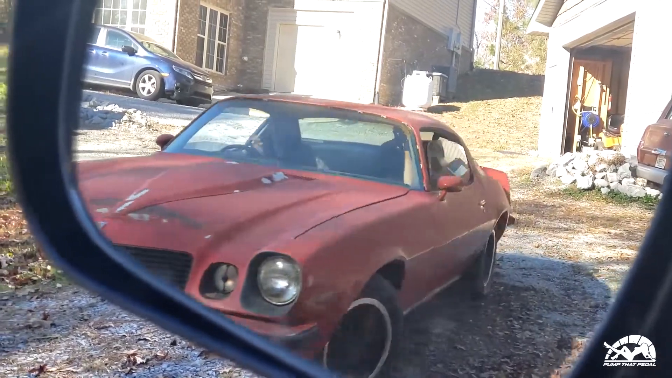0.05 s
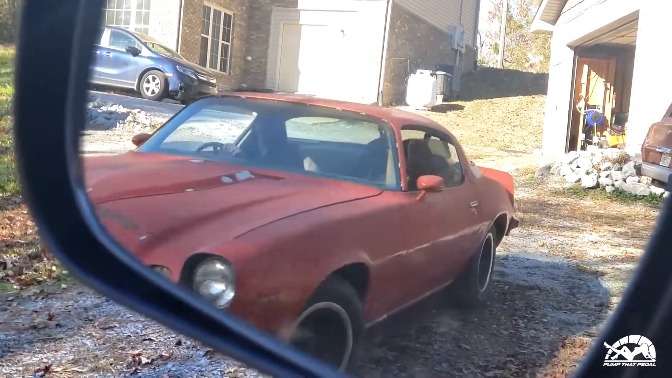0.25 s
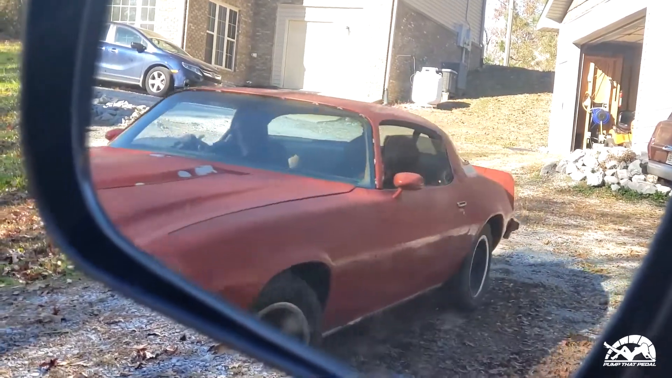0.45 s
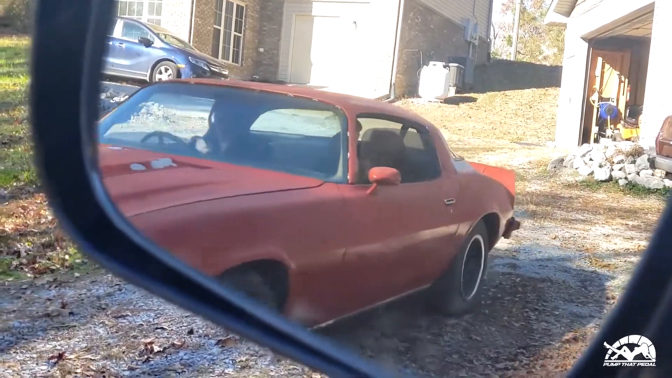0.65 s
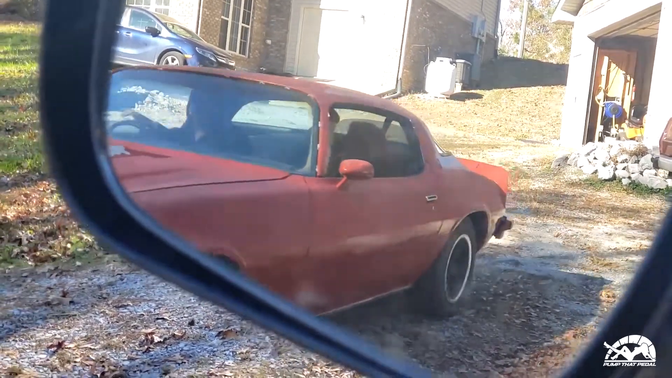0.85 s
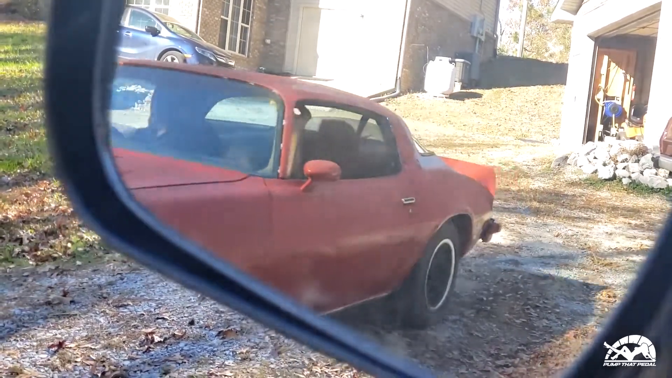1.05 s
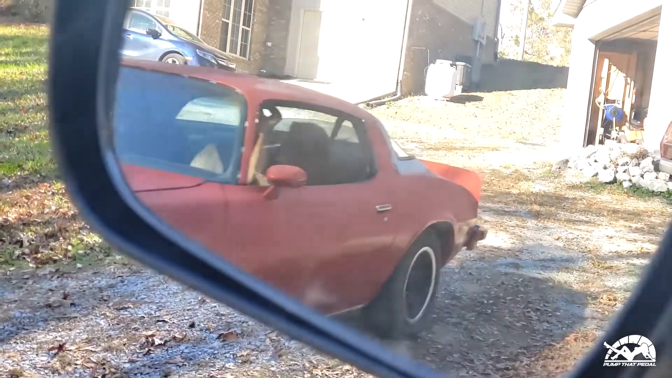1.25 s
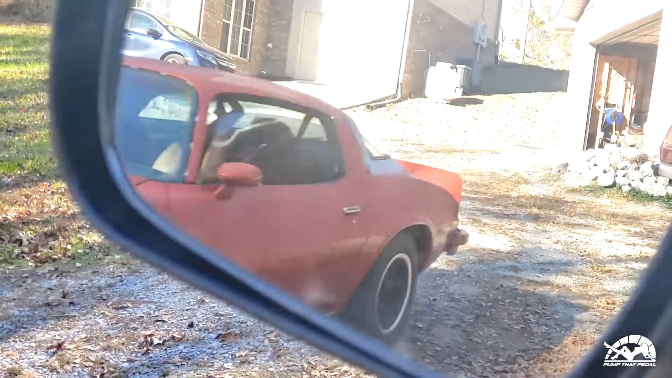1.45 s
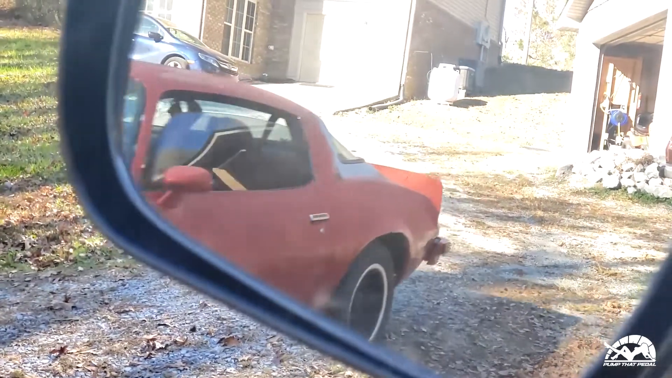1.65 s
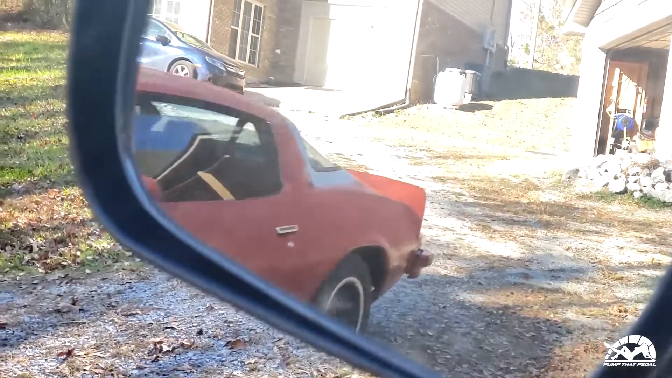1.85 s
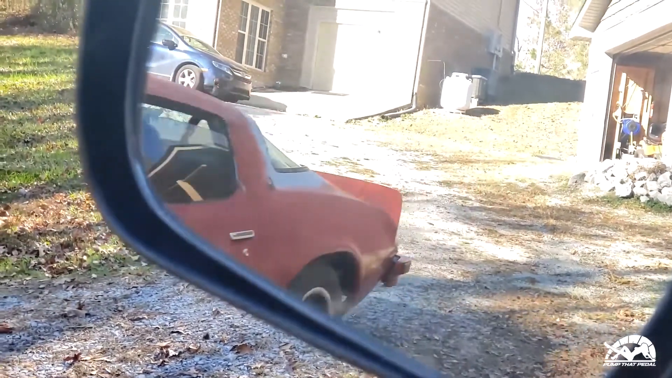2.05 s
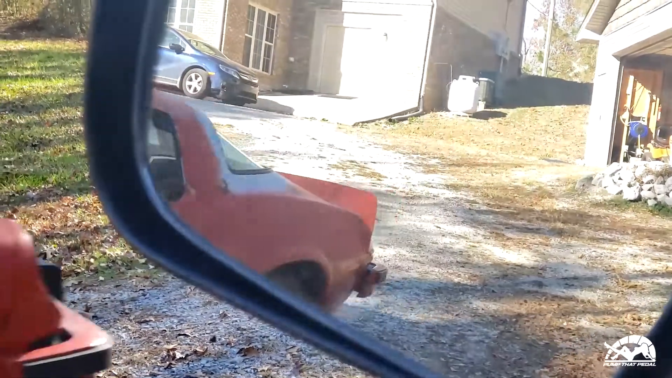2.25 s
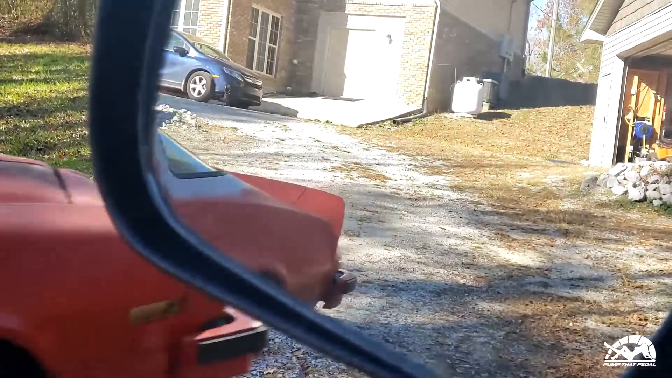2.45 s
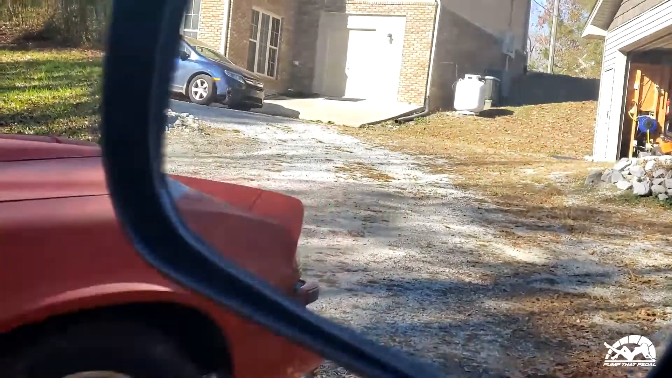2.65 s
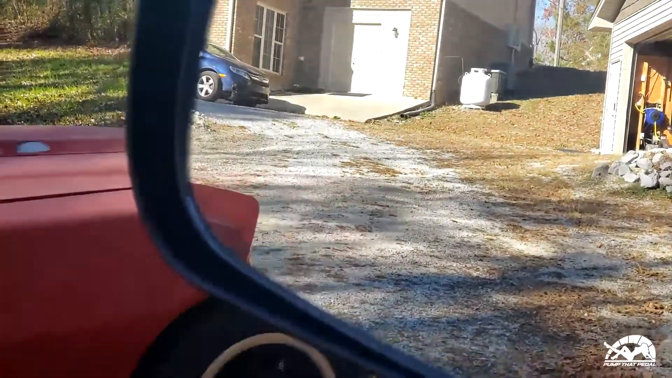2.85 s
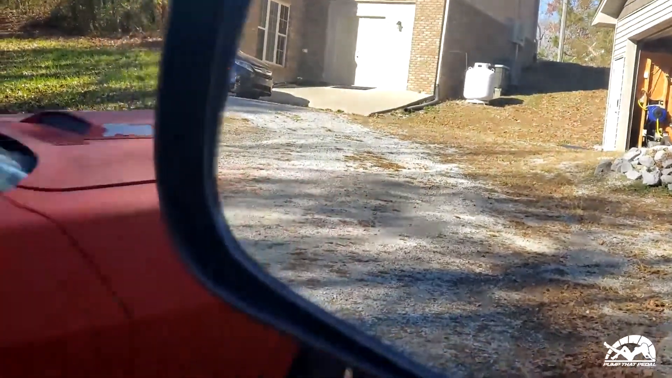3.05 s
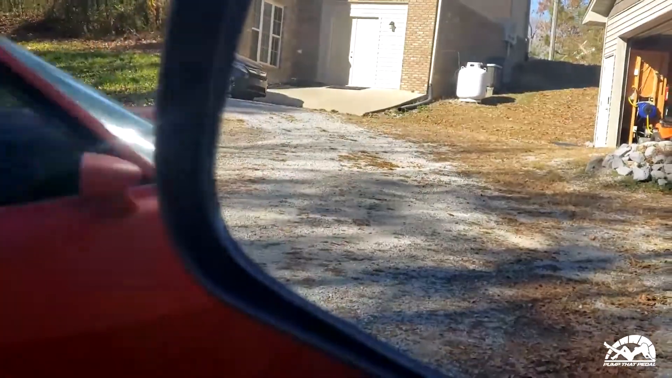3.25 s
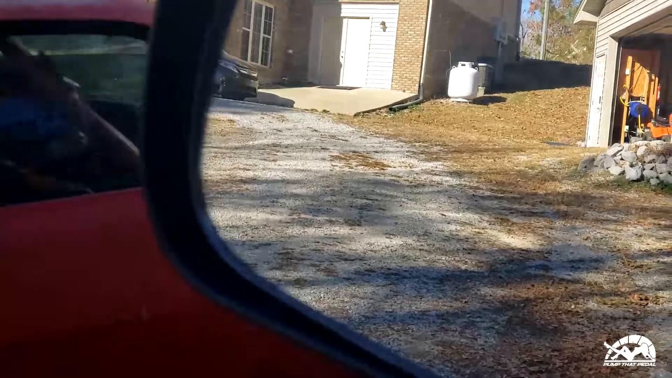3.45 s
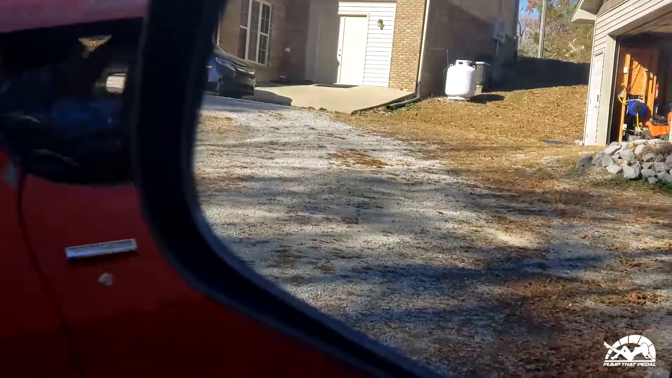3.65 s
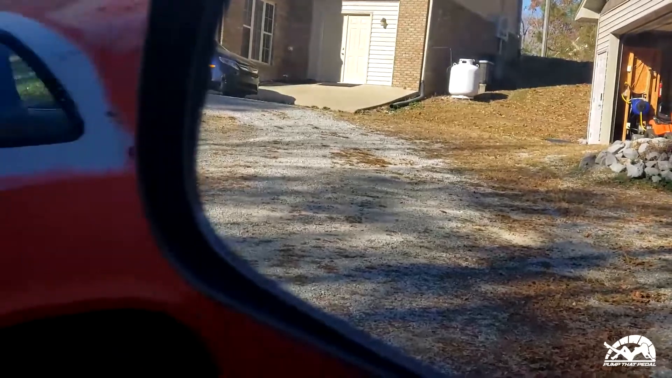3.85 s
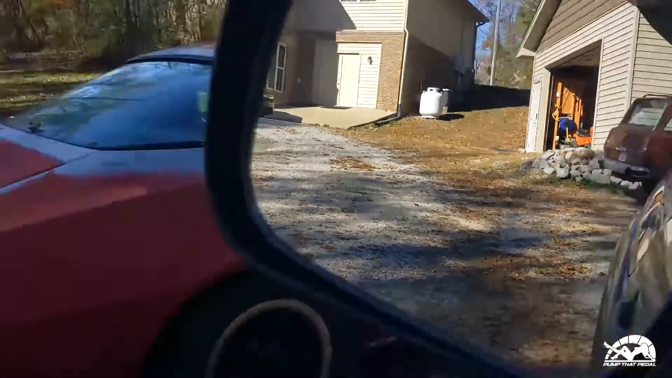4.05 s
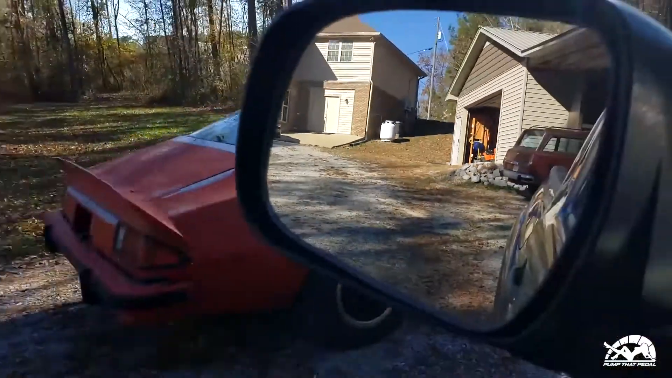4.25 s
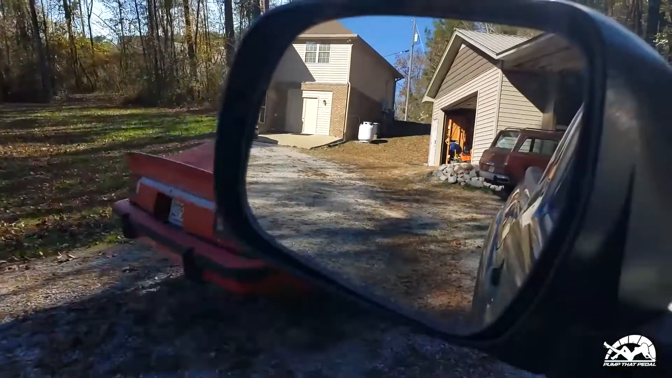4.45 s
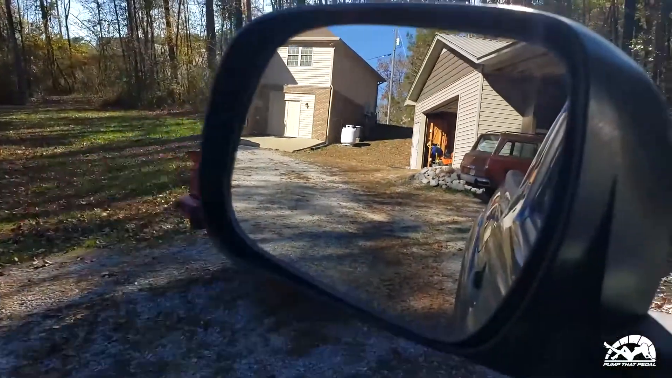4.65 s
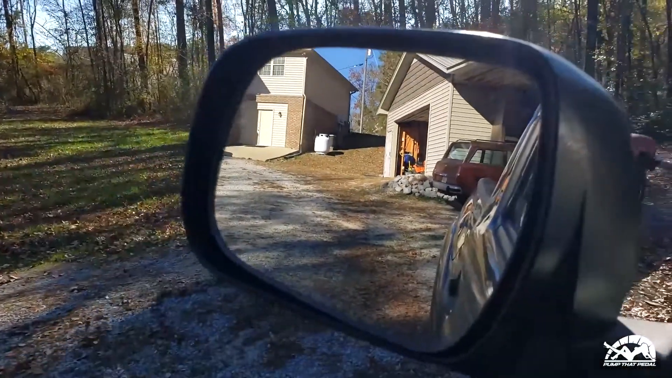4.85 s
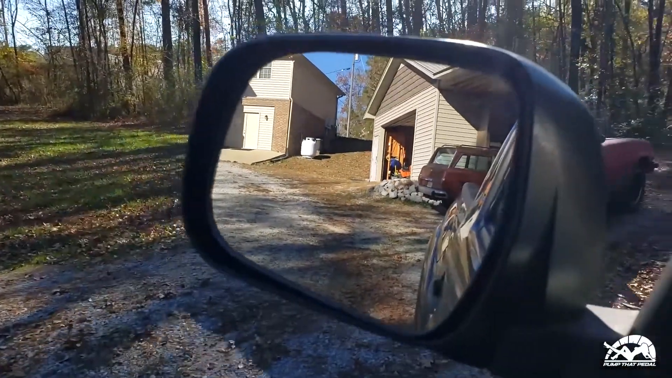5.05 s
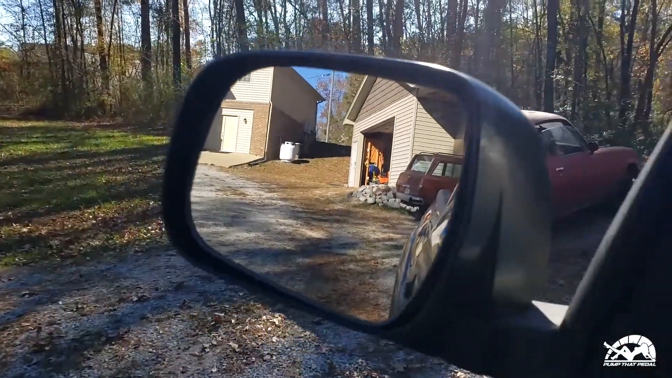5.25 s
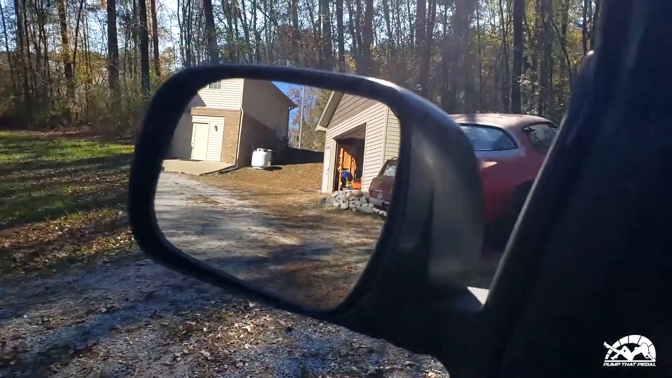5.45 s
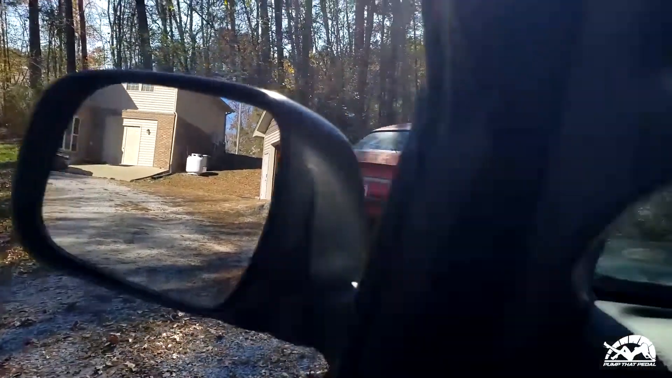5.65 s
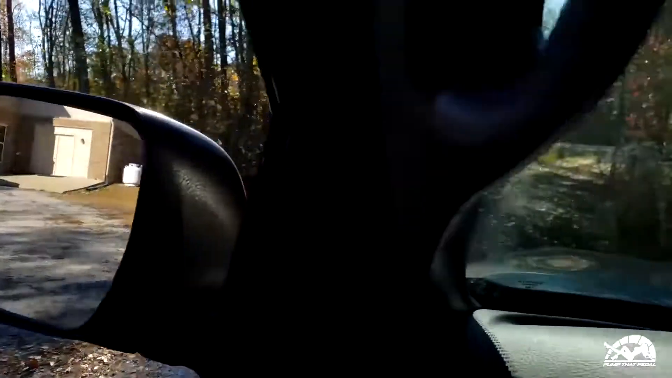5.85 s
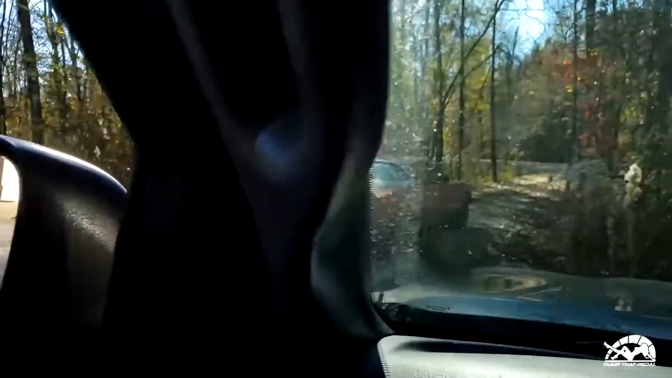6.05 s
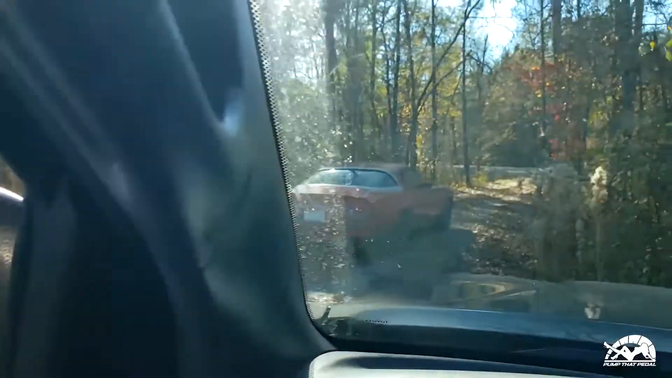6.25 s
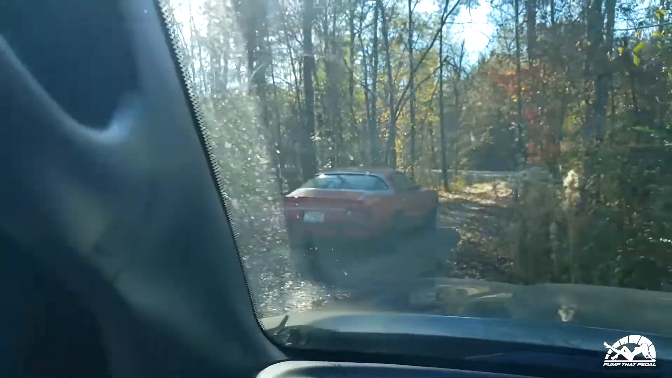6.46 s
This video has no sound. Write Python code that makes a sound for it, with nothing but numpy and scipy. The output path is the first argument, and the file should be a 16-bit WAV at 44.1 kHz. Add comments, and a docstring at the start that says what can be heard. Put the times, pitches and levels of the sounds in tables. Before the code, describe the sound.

Close outdoor stereo, heard at a parked car's open window, weighted to the left. From 0 to 3.4 s an old V8 coupe rolls slowly up from behind with a deep, loping, slightly hunting idle, under faint fan and tyre rush. Stones pop and knock dryly, clustering near 0.6, 1.4-1.7, 2-2.3 and 2.6-3.3 s; dry leaves crackle at 1.2, 2.1, 2.7 and 3.4 s. The idle stumbles at 1 s, with hollow coughs at 1.1 and 1.5 s. The car is level around 3.4 s; from 3.5 s the revs climb, with a rough bark at 3.8 s. From 4 to 5.2 s a full-throttle boom becomes a higher drone and snarl with raspy, breathy whistles, pulling ahead; gravel detail recedes. At 5.2-5.3 s the throttle shuts with a soft dull knock. Pitch falls into an uneven, hissing burble, fading and losing brightness as the microphone turns into the cabin by 6.2 s, until the end near 6.5 s.

```python
"""Old V8 passing on gravel

A V8 coupe rolls from behind on the left down a leaf-strewn gravel drive, past a parked car's open window.
Uneven gas pulses excite pipe resonances: a loping idle, then a climbing boom and snarl on open throttle.
Filtered noise makes fan, tyres, gas rasp and whistles; short damped modes make the popping stones and a
dull knock as the throttle shuts; runs of tiny cracks make the leaves. The exhaust drops to a hissing burble."""
import sys
import numpy as np
from scipy import signal
from scipy.fft import rfft, irfft, next_fast_len
from scipy.io import wavfile
from scipy.ndimage import uniform_filter1d

SR = 44100
rng = np.random.default_rng(int(sys.argv[2]) if len(sys.argv) > 2 else 0)


def generate_wav(signal):
    """Clip the signal to [-1, 1] and save it as 16-bit WAV at the path in sys.argv[1]."""
    frames = np.transpose(np.atleast_2d(signal))
    scaled = np.clip(frames, -1, 1) * 32767
    pcm = np.round(scaled).astype(np.int16)
    wavfile.write(sys.argv[1], SR, pcm)


N = 287002


def from_db(db):
    """Logarithmic level: decibels to amplitude gain."""
    return 10 ** (np.asarray(db) / 20)


def rms_one(x):
    """Power normalisation: scale to unit rms."""
    return x / np.sqrt(np.mean(x ** 2) + 1e-20)


def in_time(rows):
    """Linear interpolation: each column of a time table at every sample."""
    s, *columns = np.transpose(rows)
    return [np.interp(np.arange(N) / SR, s, c) for c in columns]


def colour(x, spectrum, resonances=()):
    """Minimum-phase filtering: a smooth spectrum with resonant lifts, which rings after a pulse."""
    size = 2 * next_fast_len(N // 2 + 8192)
    hz = np.maximum(np.abs(np.fft.fftfreq(size, 1 / SR)), 1)
    points = np.array(spectrum)
    db = np.interp(np.log(hz), np.log(points[:, 0]), points[:, 1])
    for centre, width, lift in resonances:
        db = db + lift / (1 + (2 * (hz - centre) / width) ** 2)
    # the Hilbert transform of the log gain gives the minimum phase
    response = np.exp(np.conj(signal.hilbert(np.log(from_db(db)))))
    return irfft(rfft(x, size) * response[:size // 2 + 1], size)[..., :N]


def band(x, low_hz, high_hz):
    """Zero-phase filtering: a steep band-pass without delay."""
    edges = [low_hz, min(high_hz, SR / 2 - 1000)]
    return signal.sosfiltfilt(signal.butter(3, edges, "band", fs=SR, output="sos"), x)


def drift(rate):
    """Slow random modulation: straight lines between normal values of unit spread, rate values per second."""
    knots = rng.standard_normal(4000)
    return np.interp(np.arange(N) / SR * rate, np.arange(len(knots)), knots)


def grains(per_s, spread_db):
    """Random impulse process: clicks of very uneven size, unit rms overall."""
    sizes = from_db(spread_db * np.minimum(rng.exponential(1, N), 4))
    return rms_one(sizes * rng.choice([-1, 1], N) * (rng.random(N) < per_s / SR))


def wide_noise(diffuse):
    """Partial coherence: white noise partly common to both ears and partly private to each."""
    return rms_one(rng.standard_normal(N) + diffuse * rng.standard_normal((2, N)))


def ring(clicks, hz, t60):
    """Damped resonance: a unit click starts a sine of height 1 that loses 60 dB in t60 seconds."""
    r, w = from_db(-60 / (t60 * SR)), 2 * np.pi * hz / SR
    return signal.lfilter([0, np.sin(w)], [1, -2 * r * np.cos(w), r * r], clicks + 1e-18)


def evened(x, count_so_far):
    """Short-term normalisation: unit level over each engine cycle, keeping the throb within it."""
    energy, n = np.cumsum(x ** 2), np.arange(N)
    half_cycle = len(CYLINDERS) / 2
    start = np.interp(count_so_far - half_cycle, count_so_far, n)
    end = np.interp(count_so_far + half_cycle, count_so_far, n)
    power = (np.interp(end, n, energy) - np.interp(start, n, energy)) / (end - start)
    return x / np.sqrt(power + 1e-20)


def in_ranges(x, body_db, edge_db, hiss_db):
    """Spectral balance: set the level of a noise in three broad ranges."""
    ranges = [(400, 1000, body_db), (1000, 5000, edge_db), (5000, 17000, hiss_db)]
    return sum(from_db(db) * rms_one(band(x, low, high)) for low, high, db in ranges)


def to_ears(x, lag_ms, balance):
    """Interaural differences: the right ear hears later, and balance (Hz, dB) is split between the ears."""
    n = np.arange(N)
    left, right = np.broadcast_to(x, (2, N))
    late = np.interp(n - lag_ms * SR / 1000, n, right)
    half = np.array(balance) * [1, .5]
    return np.array([colour(left, half), colour(late, half * [1, -1])])


def cabin(x, t60, wet_db):
    """Diffuse reflection: dense short echoes off the two cars and the ground, unlike in each ear."""
    t = np.arange(SR // 4) / SR
    tail = rng.standard_normal((2, len(t))) * from_db(-60 * t / t60) * (t > .002)
    tail /= np.sqrt(np.sum(tail ** 2, axis=1, keepdims=True))
    return x + from_db(wet_db) * signal.fftconvolve(x, tail, axes=1)[:, :N]


# firings per second: idle, where the converter grips, the limit the pull tends to, the floor of the run-down
IDLE_HZ, GRIP_HZ, PULL_LIMIT_HZ, COAST_HZ = 45.5, 110, 170, 60
OPEN_S, LIFT_S = 3.537, 5.24   # the engine starts to flare; the foot lifts
FLARE_PER_S, PULL_S, RUN_DOWN_PER_S = 1.72, .61, .86   # growth rate, time constant, decay rate
# hunting of the idle, with a sag at the stumble: (time [s], firing rate [Hz])
IDLE_HUNT = [(0, 47.06), (.9, 45.25), (1.05, 43.2), (1.2, 42.85), (1.8, 45.75), (2.4, 44.7), (3, 46.3),
             (3.53, 45.5)]


def engine_speed():
    """Exponential response: free flare, a pull held back by the converter, run-down; in firings per second."""
    t = np.arange(N) / SR
    grip_s = OPEN_S + np.log(GRIP_HZ / IDLE_HZ) / FLARE_PER_S
    flare = in_time(IDLE_HUNT)[0] * np.exp(FLARE_PER_S * np.maximum(t - OPEN_S, 0))
    shortfall = (PULL_LIMIT_HZ - GRIP_HZ) * np.exp((grip_s - np.minimum(t, LIFT_S)) / PULL_S)
    run_down = np.exp(-RUN_DOWN_PER_S * np.maximum(t - LIFT_S, 0))
    driven = np.maximum((PULL_LIMIT_HZ - shortfall) * run_down, COAST_HZ)
    return np.where(t < grip_s, flare, driven)


# the car comes level at PASS_S, rolling steadily, and gathers speed from OPEN_S; it passes at SIDE_M
PASS_S, ROLL_M_PER_S, ACCEL_M_PER_S2, SIDE_M = 3.41, 2, 3.2, 1.5


def metres_ahead():
    """Uniform acceleration: the car's place along the drive, negative while it is still behind."""
    t = np.arange(N) / SR
    return ROLL_M_PER_S * (t - PASS_S) + ACCEL_M_PER_S2 / 2 * np.maximum(t - OPEN_S, 0) ** 2


TURN_S, TURN_TAKES_S = 5.34, 0.89   # the listener turns from the open window into the cabin


def loudness(firing_hz, throttle, idle_db, load_db, octave_db, cabin_db, spreading=1):
    """Distance law: idle level alongside, plus throttle, octaves of engine speed, spreading and the cabin."""
    inside = np.clip((np.arange(N) / SR - TURN_S) / TURN_TAKES_S, 0, 1)
    distance_db = -20 * np.log10(np.hypot(metres_ahead(), SIDE_M) / SIDE_M)
    engine_db = idle_db + load_db * throttle + octave_db * np.log2(firing_hz / IDLE_HZ)
    return engine_db + spreading * distance_db + cabin_db * inside


# cylinders in firing order, at idle unevenness: (pulse strength [dB], arrival at tailpipe [firing intervals])
CYLINDERS = [(-3.3, .64), (-2.8, .43), (1.1, .53), (.2, .5), (-.7, .34), (4, .48), (2.2, .36), (-.8, .42)]


def firings(count_so_far, throttle, lope):
    """Pulse train: one gas pulse a firing; the two banks arrive unevenly, which gives the V8 its lope."""
    number = np.arange(int(count_so_far[-1]) - 1)
    strength_db, arrival = np.array(CYLINDERS)[number % len(CYLINDERS)].T
    fired = np.searchsorted(count_so_far, number)
    strength_db = lope[fired] * strength_db
    arrival = .5 + lope[fired] * (arrival - .5)
    chance = rng.standard_normal((len(number), 2))
    # combustion is ragged with the throttle shut and steadier with it open
    ragged_db = np.interp(throttle[fired], [0, .4, 1], [1.1, .7, .45])
    at = np.searchsorted(count_so_far, number + arrival + .008 * ragged_db * chance[:, 0])
    pulses = np.zeros(N)
    pulses[np.minimum(at, N - 1)] = from_db(strength_db + ragged_db * chance[:, 1])
    return pulses


def swell(firing_hz, resonance, order=2):
    """Resonance curve: lift in dB as the firing rate sweeps through; a higher order has a flatter top."""
    hz, width_hz, lift_db = resonance
    return lift_db / (1 + np.abs(2 * (firing_hz - hz) / width_hz) ** order)


# pipe resonances that the firing rate crosses: (centre [Hz], width [Hz], full lift [dB])
BOOM_RESONANCE, DRONE_RESONANCE = (81, 42, 8.7), (137.3, 25, 7.45)
COAST_RESONANCE = (127, 44, 6)   # the upper one is broader and weaker with the throttle shut
STUMBLE_S, STUMBLE_TAKES_S, STUMBLE_DB = 1, 0.024, -8   # centre, Gaussian width, dip of the boom


def exhaust_levels(firing_hz, throttle, boom_wander_db=3.0, drone_wander_db=6.0, growl_wander_db=2.5):
    """Swept resonance: boom, drone and growl in dB; with the throttle shut they wander, most at low speed."""
    stumble_db = STUMBLE_DB * np.exp(-((np.arange(N) / SR - STUMBLE_S) / STUMBLE_TAKES_S) ** 2)
    boom = loudness(firing_hz, throttle, idle_db=-18.5, load_db=-2.5, octave_db=2.5, cabin_db=-4.0)
    boom = boom + np.minimum(.7 + throttle, 1) * swell(firing_hz, BOOM_RESONANCE, order=6)
    drone = loudness(firing_hz, throttle, idle_db=-26, load_db=2.0, octave_db=5.5, cabin_db=9.0,
                     spreading=1.365)
    drone = drone + throttle * swell(firing_hz, DRONE_RESONANCE)
    drone = drone + (1 - throttle) * swell(firing_hz, COAST_RESONANCE, order=4)
    growl = loudness(firing_hz, throttle, idle_db=-41.5, load_db=10.0, octave_db=-0.65, cabin_db=-19.0,
                     spreading=0.18)
    shut = (1 - throttle) * np.minimum(COAST_HZ / firing_hz, 1)
    return (boom + stumble_db + boom_wander_db * shut * drift(rate=8.5),
            drone + stumble_db / 2 + drone_wander_db * shut * np.tanh(drift(rate=8.8)),
            growl + stumble_db / 2 + growl_wander_db * shut * drift(rate=11.0))


# orders that swell under load: (multiple of engine cycle rate [1], level against the firing line [dB])
LOAD_ORDERS = [(4, -19), (12, -4), (16, -3), (17, -7), (18, -6), (20, -7), (21, -8)]
# response of pipes and mufflers: (frequency [Hz], relative gain [dB])
PIPE_RESPONSE = [(25, -50.5), (35, -9.5), (45, 5), (60, 10), (75, 21.5), (92, 19.5), (110, 9), (140, -4.5),
                 (165, -17), (200, -10.5), (320, -27), (450, -30)]
# muffler chambers, which the orders sweep through: (centre [Hz], width [Hz], lift [dB])
CHAMBERS = [(205, 40, -5), (240, 20, 4), (270, 35, -6), (340, 70, 9)]
# turbulence in the mufflers: (frequency [Hz], relative density [dB])
CHURN_SPECTRUM = [(100, -49), (190, -3.5), (255, 2.5), (330, -5), (420, -3.5), (700, -48.5)]


def exhaust(pulses, count_so_far, firing_hz, throttle, idle_churn_db=9.0):
    """Source and filter: pulses ring the pipes, load adds boom and singing orders, turbulence blurs the idle."""
    boom_db, drone_db, growl_db = exhaust_levels(firing_hz, throttle)
    angle = 2 * np.pi * count_so_far / len(CYLINDERS)
    line = 2 * np.gradient(count_so_far)   # height of one harmonic of the pulse train
    singing = sum(from_db(db + 2 * drift(rate=10)) * np.cos(order * angle) for order, db in LOAD_ORDERS)
    piped = colour(pulses + throttle ** 4 * line * singing, PIPE_RESPONSE, CHAMBERS)
    # under load the firing line grows as it crosses the lowest resonance
    driven = np.minimum(throttle / .4, 1)
    extra = from_db(swell(firing_hz, BOOM_RESONANCE, order=6)) - 1
    locked = driven * extra * line * -np.cos(2 * np.pi * count_so_far)
    deep = band(piped + colour(locked, PIPE_RESPONSE), 33, 114.4)
    thinned = deep - .7 * throttle ** 2 * band(deep, 20, 58)
    boom = from_db(boom_db) * evened(thinned, count_so_far)
    drone = from_db(drone_db) * evened(band(piped, 121.8, 185.0), count_so_far)
    churn_db = idle_churn_db * (1 - throttle ** 2) - 8 * throttle ** 2
    churn = from_db(churn_db) * rms_one(colour(rng.standard_normal(N), CHURN_SPECTRUM))
    orders = evened(band(piped, 171.0, 433), count_so_far)
    growl = from_db(growl_db) * evened(orders + churn, count_so_far)
    rumble = from_db(boom_db - 25.5 - 8.3 * throttle) * rms_one(band(rng.standard_normal(N), 23, 90))
    return boom + drone + growl + rumble


# fan, belts and rolling tyres: (frequency [Hz], relative density [dB])
ROLLING_SPECTRUM = [(120, -41.5), (200, -20), (254, -9), (416, -25.5), (473, -4), (683, 3.5), (867, -4),
                    (1230, 4.5), (4350, -14.5), (5040, -26), (6170, -28), (7410, -36), (12200, -30.5),
                    (16000, -31)]
# resonances of the same noise: (centre [Hz], width [Hz], lift [dB])
ENGINE_BAY = [(640, 260, -3.5), (3160, 150, 4.5), (6070, 154, 9)]
# tyres and fan as the car comes by: (time [s], relative level [dB])
APPROACH = [(0.08, -38.5), (0.32, -39.5), (1.1, -41), (1.38, -38), (1.63, -38.5), (2.5, -41), (3.16, -38.5),
            (3.47, -41.5), (3.6, -37.5), (3.76, -30.5)]
# once the nose is past, the body hides the fan's hiss and the tyres recede
HIDDEN_DB, HIDING_S, RECEDE_DB_PER_S = -7, 0.068, 16.5


def rolling(grit_db=0.0, body_db=0.0, edge_db=-4.5, hiss_db=-10.0):
    """Broadband noise: smooth fan rush plus clumps of gravel grinding under the tyres."""
    grit = rms_one(grains(per_s=1000, spread_db=4) * from_db(5.5 * np.tanh(drift(rate=30))))
    muffled = colour(grit, [(2200, 0.81), (5000, -1.1)])   # the tread covers the stones it grinds
    noise = colour(wide_noise(diffuse=24.0) + from_db(grit_db) * muffled, ROLLING_SPECTRUM, ENGINE_BAY)
    past_s = np.maximum(np.arange(N) / SR - PASS_S, 0)
    db = in_time(APPROACH)[0] - RECEDE_DB_PER_S * past_s
    hidden_db = HIDDEN_DB * np.minimum(past_s / HIDING_S, 1)
    return in_ranges(noise, db + body_db, db + edge_db, db + hiss_db + hidden_db)


# rasp of gas from the tailpipes: (frequency [Hz], relative density [dB])
RASP_SPECTRUM = [(180, -32), (300, 3.5), (440, -10.5), (701, -6), (787, -8.5), (1640, -23), (1840, -21.5),
                 (2880, -40), (5900, -46.5), (7570, -61), (12500, -56), (16000, -70.5)]
# its resonances: (centre [Hz], width [Hz], lift [dB])
TAILPIPE = [(660, 61, 2.1), (1812, 40, 7.5), (2130, 460, 2.2)]


def rasp(pulses, firing_hz, throttle, puff_s=0.02, steady=0.31, buzz_db=-9.5):
    """Jet noise: each pulse leaves with a puff of turbulence and, under load, a sharp front which buzzes."""
    puffs = rms_one(signal.lfilter([1], [1, -np.exp(-1 / (puff_s * SR))], pulses))
    buzz = from_db(buzz_db) * throttle * colour(rms_one(pulses), [(1000, 0), (2500, -14)])
    turbulence = rms_one(wide_noise(diffuse=1.0) * (steady + puffs))
    noise = colour(turbulence + buzz, RASP_SPECTRUM, TAILPIPE)
    body = loudness(firing_hz, throttle, idle_db=-58.5, load_db=-18.0, octave_db=13.5, cabin_db=6.5)
    edge = loudness(firing_hz, throttle, idle_db=-56.5, load_db=-2.0, octave_db=10.0, cabin_db=3.5)
    hiss = loudness(firing_hz, throttle, idle_db=-65.0, load_db=-5.0, octave_db=4.0, cabin_db=-1.5)
    return in_ranges(noise, body, edge, hiss)


# howl and whistles of gas in the pipes: (pitch at PULL_LIMIT_HZ [Hz], flutter rate [1/s], relative level [dB])
WHISTLES = [(345, 55, 6), (875, 70, 0), (2170, 160, -8), (3860, 220, -19), (5850, 500, -27)]
WHISTLE_FOLLOWS = .18   # pitch goes as this power of engine speed


def whistles(firing_hz, throttle):
    """Flow tones: breathy narrow bands that glide up and down with the flow of gas."""
    level = loudness(firing_hz, throttle, idle_db=-64, load_db=6, octave_db=10.5, cabin_db=-14)
    turns = 2 * np.pi * np.cumsum((firing_hz / PULL_LIMIT_HZ) ** WHISTLE_FOLLOWS) / SR
    tones = np.zeros(N)
    for hz, width, db in WHISTLES:
        # two random amplitudes in quadrature broaden the tone
        tones += from_db(db) * (drift(width) * np.cos(hz * turns) + drift(width) * np.sin(hz * turns))
    return from_db(level) * tones


def ticks(level_db=-80.0, after_db_per_s=-5.0):
    """Impulsive noise: single chips of grit crack under the tyres, louder as the car nears."""
    past_s = np.maximum(np.arange(N) / SR - PASS_S, 0)
    near_db = -10 * np.log10(np.hypot(metres_ahead(), SIDE_M) / SIDE_M)
    chips = rms_one(band(grains(per_s=70, spread_db=4.5), 2500, 17000))
    return from_db(level_db + near_db + after_db_per_s * past_s) * chips


# loudest stones squeezed from under the tyres; the last row is a dull knock as the throttle shuts:
# (time [s], relative knock peak [dB], relative crack peak [dB], pitch [Hz])
KNOCKS = [(.0345, -12, -40, 1570), (.1888, -23, -46, 1220), (.5062, -26, -26, 1220), (.6154, -19, -31, 720),
          (.6254, -16, -38, 975), (.6312, -15, -24, 1320), (.638, -13, -40, 1150), (.6615, -16, -44, 1160),
          (.7875, -21, -21, 1500), (1.4122, -13.5, -42, 1060), (1.418, -12.5, -33, 1370),
          (1.4239, -28, -28, 970), (1.5682, -27, -28, 920), (1.6738, -8, -24, 1050),
          (1.7166, -19.5, -33, 1740), (1.8785, -19, -45, 1180), (2.0263, -14.5, -42, 1090),
          (2.134, -16.5, -25, 910), (2.1719, -16, -15.5, 910), (2.2811, -16, -25.5, 1660),
          (2.6022, -15.5, -36, 1290), (2.61, -21, -45, 850), (2.6435, -14, -45, 676),
          (2.738, -17.5, -45, 900), (2.7689, -14.5, -24, 860), (2.9574, -12, -38, 1120),
          (2.9665, -14.5, -38, 760), (2.994, -21, -44, 650), (3.118, -15.5, -32, 750),
          (3.2013, -12.5, -42, 1150), (3.2695, -20, -23, 1130), (3.2763, -13.5, -16.5, 860),
          (3.405, -14.5, -34, 790), (3.5547, -17.5, -52, 890), (3.6215, -18, -32, 1020),
          (4.7832, -20.5, -62, 950), (5.2862, -26.5, -66, 860)]
# heavily damped ring of stone and tyre, lent to the last knock too:
# (multiple of the row's pitch [1], level [dB], t60 [cycles])
STONE_MODES = [(.55, -8, 8), (1, 0, 7), (1.8, -4, 8)]
# smaller stones, scattered at random until the pass; middle values of knock dB, crack dB and pitch Hz
SMALL_STONE, SMALL_STONES_PER_S = (-22, -48, 1200), 10


def stones(grit_db=-10.0, grit_s=0.011, knock_db=-2.0, crack_db=-2.0):
    """Impact excitation: a stone snaps free with a dry knock, then weaker contacts; so too the throttle knock."""
    t = np.arange(SR // 10) / SR
    tyre = signal.butter(2, [400, 3600], "band", fs=SR)
    small_db, small_crack_db, small_hz = SMALL_STONE
    small = []
    for when, size, pitch in rng.random((200, 3))[:int(SMALL_STONES_PER_S * PASS_S)]:
        size_db = 6 * (size - .5)
        small.append((when * PASS_S, small_db + size_db, small_crack_db + size_db,
                      small_hz * 2 ** (pitch - .5)))
    knocks, cracks = np.zeros(N), np.zeros(N)
    for s, peak_db, sharp_db, pitch_hz in list(KNOCKS) + small:
        # neighbouring stones settle
        contacts = rng.uniform(-1.7, 1.7, len(t)) * (rng.random(len(t)) < 1100 / SR)
        touch = from_db(grit_db) * contacts * np.exp(-t / grit_s) * (t > .002)
        touch[0] = 1
        modes = np.zeros(len(t))
        for ratio, db, cycles in STONE_MODES:
            hz = pitch_hz * ratio
            modes += from_db(db) * ring(touch, hz, cycles / hz)
        knock = signal.lfilter(*tyre, modes)
        crack = rng.standard_normal(len(t)) * np.exp(-t / .0009)
        span = slice(round(s * SR), round(s * SR) + len(t))
        knocks[span] += from_db(peak_db + knock_db) * knock / np.abs(knock).max()
        cracks[span] += from_db(sharp_db + crack_db) * crack / np.abs(crack).max()
    return knocks + band(cracks, 1600, 17000)


# coughs of the idle: (time [s], relative level [dB])
CHUFFS = [(1.118, -30.5), (1.46, -33)]


def chuffs(attack_s=0.013, fade_s=0.033):
    """Cavity resonance: late-burning gas gives a hollow cough in the muffler."""
    t = np.arange(N) / SR
    envelope = sum(from_db(db) * np.exp(np.minimum((t - s) / attack_s, (s - t) / fade_s)) for s, db in CHUFFS)
    return envelope * rms_one(band(rng.standard_normal(N), 242, 270))


# dry leaves crushed: (time [s], length [s], relative level [dB])
LEAVES = [(1.232, 0.071, -39.5), (2.054, 0.064, -39), (2.666, 0.095, -45), (2.809, 0.063, -50),
          (3.105, 0.12, -52), (3.388, 0.067, -40), (3.687, 0.087, -47), (3.971, 0.091, -46.5),
          (4.398, 0.091, -61), (4.504, 0.08, -62), (4.892, 0.065, -61)]
# their colour: (frequency [Hz], relative density [dB])
LEAF_COLOUR = [(1500, -22), (4000, -8), (6000, -6), (8000, -7), (11500, 0), (15500, 0)]


def leaves(rise_s=0.011, fade_s=0.051, crush_db=5.0, snaps_per_s=110, snap_s=0.0014, rustle=0.064):
    """Brittle fracture: a leaf collapses in a quick run of snaps, each a shower of tiny bright cracks."""
    t = np.arange(N) / SR
    crush = np.zeros(N)
    for s, length, db in LEAVES:
        ramp = np.clip(np.minimum((t - s) / rise_s, (s + length - t) / fade_s), 0, 1)
        crush += from_db(db + crush_db) * ramp
    since_snap = (t * snaps_per_s + .5 * drift(rate=88)) % 1 / snaps_per_s
    snaps = rustle + np.exp(-since_snap / snap_s)
    cracks = grains(per_s=6000, spread_db=4) * snaps * from_db(2.5 * drift(rate=100))
    cracks = band(colour(cracks, LEAF_COLOUR), 1200, 19000)
    # even out the level over 50 ms
    return crush * cracks / np.sqrt(np.abs(uniform_filter1d(cracks ** 2, SR // 20)) + 1e-12)


# upper modes of the pipes, sounded by the pulses under load: (centre [Hz], width [Hz], lift [dB])
SNARL_MODES = [(587, 36, 12.5), (651, 34, 11), (715, 49, 12.5), (916, 55, 6.5)]


def snarl(pulses, count_so_far, firing_hz, throttle):
    """Wavefront turbulence: under load, torn pulse fronts send rough orders climbing through upper pipe modes."""
    torn = signal.lfilter([1], [1, -np.exp(-1 / (.003 * SR))], pulses) * rng.standard_normal(N)
    fronts = rms_one(pulses) + .6 * rms_one(torn)
    stack = evened(band(colour(fronts, [(500, 0), (1400, -5)], SNARL_MODES), 480, 1500), count_so_far)
    level = loudness(firing_hz, throttle, idle_db=-40.5, load_db=0, octave_db=1.0, cabin_db=0, spreading=.2)
    return throttle * from_db(level) * stack


BARK_S, BARK_DB = 3.77, -32.5   # peak time; peak level of the envelope
# modes of the bark: (centre [Hz], width [Hz], lift [dB])
BARK_MODES = [(695, 19, 32), (798, 64, 10)]


def bark(pulses, rise_s=0.035, fade_s=0.066, puff_s=0.01):
    """Modal excitation: the first gulp of throttle blows rough puffs of gas through the pipes' modes."""
    since = np.arange(N) / SR - BARK_S
    envelope = np.exp(np.minimum(since / rise_s, -since / fade_s))
    puffs = signal.lfilter([1], [1, -np.exp(-1 / (puff_s * SR))], pulses) * rng.standard_normal(N)
    voiced = colour(puffs, [(300, -23), (650, 5.0), (2200, 0.0), (8000, -19)], BARK_MODES)
    return from_db(BARK_DB) * envelope * rms_one(voiced)


# hiss of gas in the pipes on the overrun: (frequency [Hz], relative density [dB])
OVERRUN_SPECTRUM = [(500, -16), (1500, 1), (2600, -7), (5600, -7), (7000, -13.5), (16000, -20)]
# its resonances: (centre [Hz], width [Hz], lift [dB])
OVERRUN_MODES = [(830, 70, 23), (2060, 130, 19), (3700, 250, 11)]
OVERRUN_DB = -58   # before the sag and flutter


def overrun(rise_s=0.081, hold_s=0.48, sag_db_per_s=-15.0, shut_db_per_s=-60.0):
    """Flow noise: with the throttle shut the pipes ring and hiss in flutters, until the cabin shuts them out."""
    since = np.arange(N) / SR - LIFT_S
    sag_db = sag_db_per_s * np.maximum(since, 0)
    shut_db = shut_db_per_s * np.maximum(since - hold_s, 0)
    db = OVERRUN_DB + sag_db + shut_db + 5.2 * drift(rate=36)
    hiss = rms_one(colour(wide_noise(diffuse=1.0), OVERRUN_SPECTRUM, OVERRUN_MODES))
    return np.clip(since / rise_s, 0, 1) * from_db(db) * hiss


# the driver's foot: (time [s], throttle [0-1], unevenness of the cylinders [1 = as at idle])
THROTTLE = [(3.6, 0, 1), (3.72, .4, 1.1), (3.96, .5, 1.2), (4.06, .72, 1.25), (4.6, 1, 1.1), (5.24, 1, 1.1),
            (5.3, 0, 1.7), (6.5, 0, 1.2)]
# left over right for tyres and fan: (frequency [Hz], level difference [dB])
NEAR_BALANCE = [(200, 24), (380, 19), (700, -4.5), (1290, 4.5), (2380, 12.5), (4400, 6), (8000, 2.5),
                (15000, 3)]
# left over right for tailpipe sounds: (frequency [Hz], level difference [dB])
FAR_BALANCE = [(200, 3.5), (380, 14.5), (700, 5.3), (1290, 10.5), (2380, 11), (4400, 11.3), (15000, 23.6)]
START_FIRINGS = .5   # firing count at the start
TAIL_M, EAR_LAG_MS = 1, .64   # tailpipes trail the car's middle; greatest lag of the right ear


def scene():
    """Superposition: the layers sum as the car passes from behind on the left to ahead."""
    firing_hz = engine_speed()
    count_so_far = START_FIRINGS + np.cumsum(firing_hz) / SR
    throttle, lope = in_time(THROTTLE)
    tail_m = metres_ahead() - TAIL_M
    lag_ms = EAR_LAG_MS * (1 - tail_m / np.hypot(tail_m, SIDE_M)) / 2
    pulses = firings(count_so_far, throttle, lope)
    low = exhaust(pulses, count_so_far, firing_hz, throttle) + chuffs()
    pipes = to_ears(low, lag_ms, [(60, 3.0), (120, 3.4), (300, 3.5)])
    front = to_ears(rolling(), lag_ms, NEAR_BALANCE)
    tones = snarl(pulses, count_so_far, firing_hz, throttle) + bark(pulses) + whistles(firing_hz, throttle)
    tail = to_ears(rasp(pulses, firing_hz, throttle) + tones + overrun(), lag_ms, FAR_BALANCE)
    gravel = to_ears(stones(), .4 * lag_ms, [(700, 2), (2000, 7), (8000, 4)])
    litter = to_ears(leaves() + ticks(), lag_ms, [(3000, 22.0), (15000, 0.66)])
    gravel = cabin(gravel, t60=0.06, wet_db=-6)
    return pipes + front + tail + gravel + cabin(litter, t60=0.035, wet_db=-0.5)


CUTOFF_HZ = 16000


def record(dry):
    """Band limiting: an elliptic low-pass cuts the top steeply."""
    return signal.sosfilt(signal.ellip(10, .1, 80, CUTOFF_HZ, fs=SR, output="sos"), dry)


dry = scene()
out = record(dry)
generate_wav(out)
```